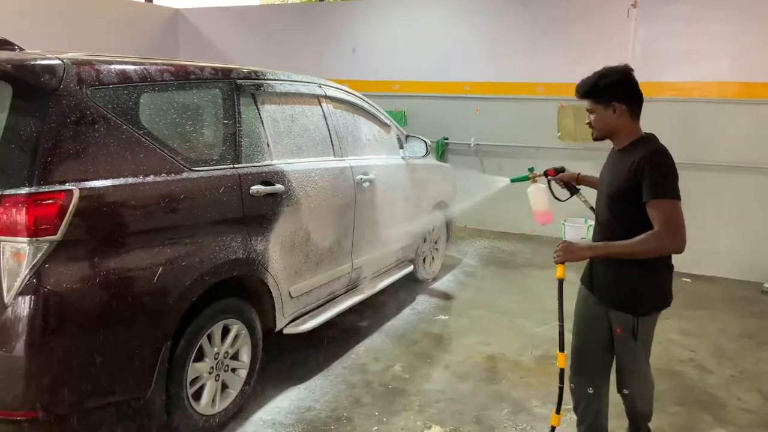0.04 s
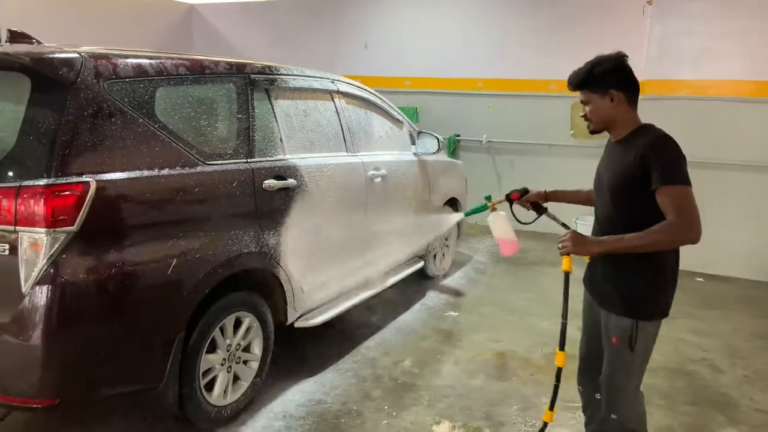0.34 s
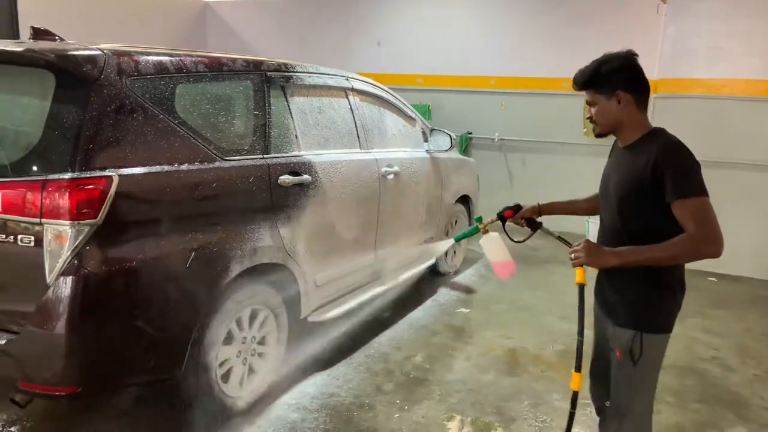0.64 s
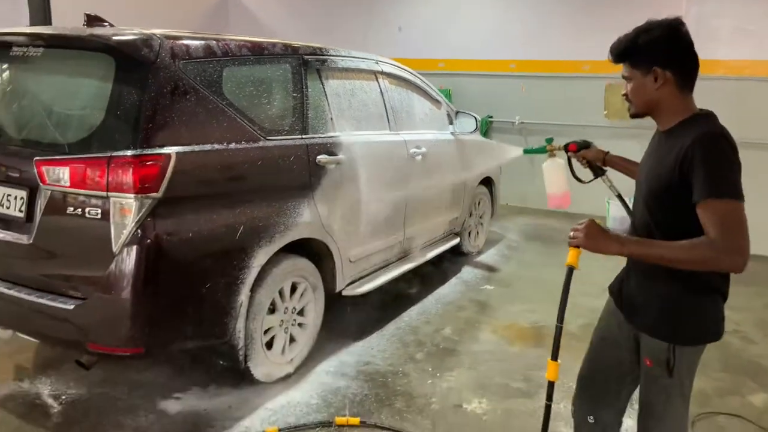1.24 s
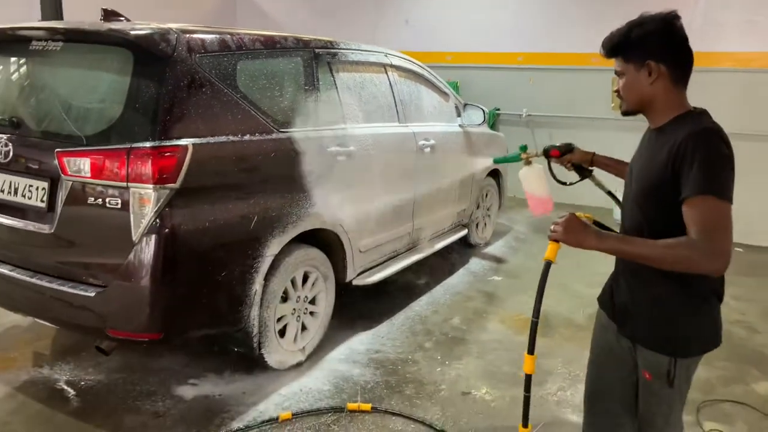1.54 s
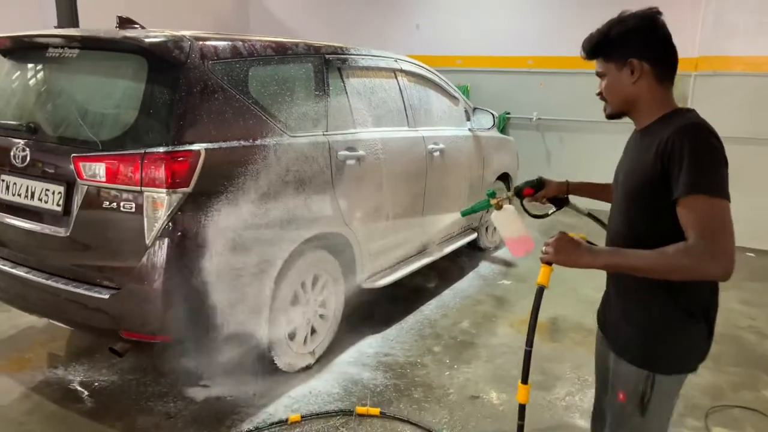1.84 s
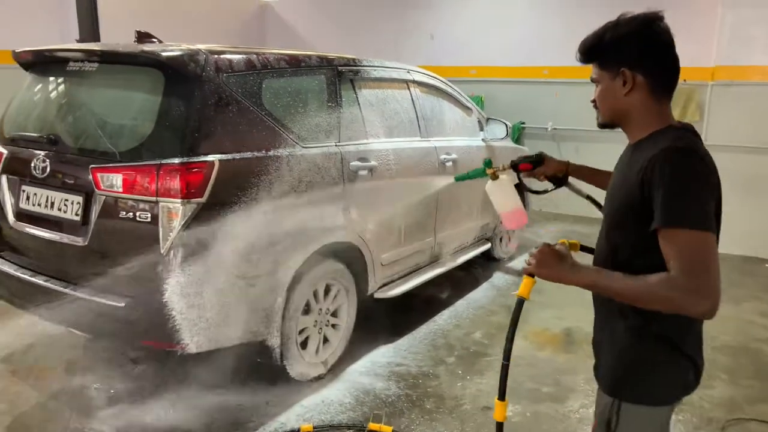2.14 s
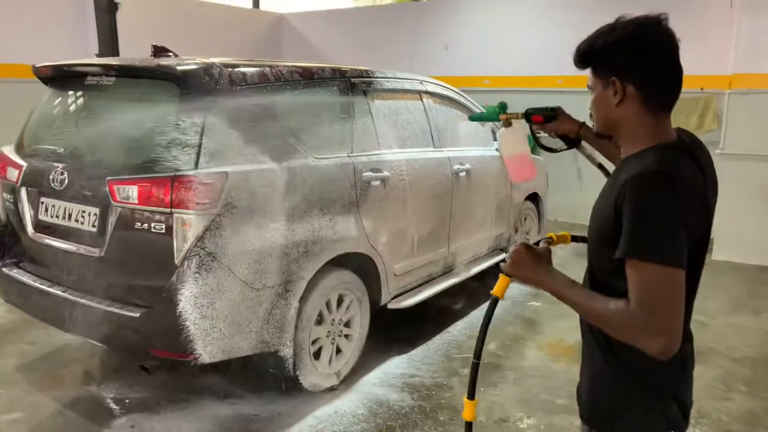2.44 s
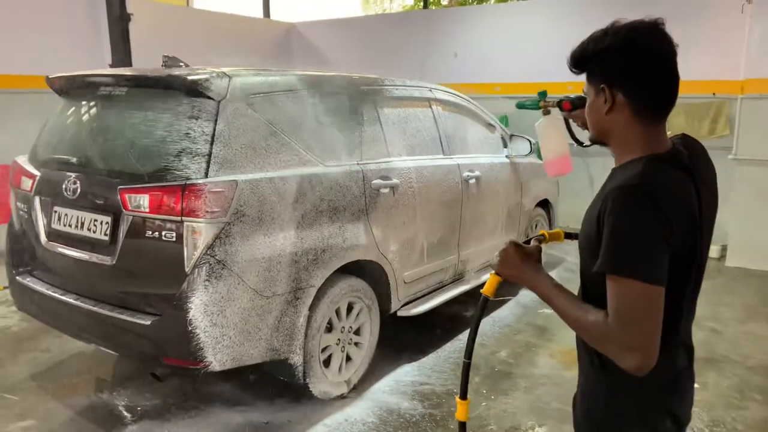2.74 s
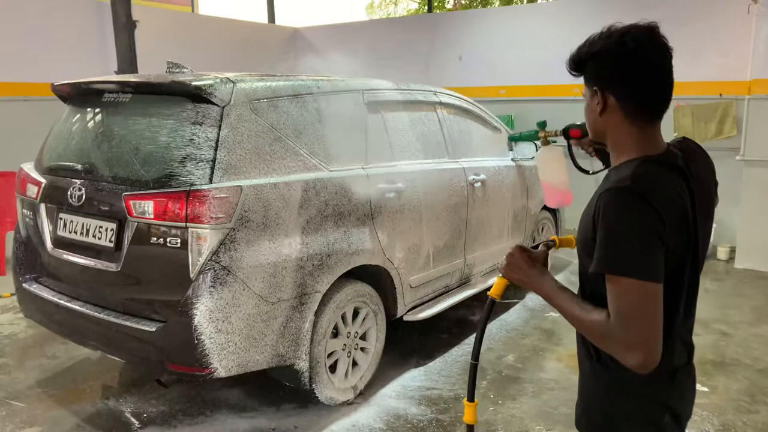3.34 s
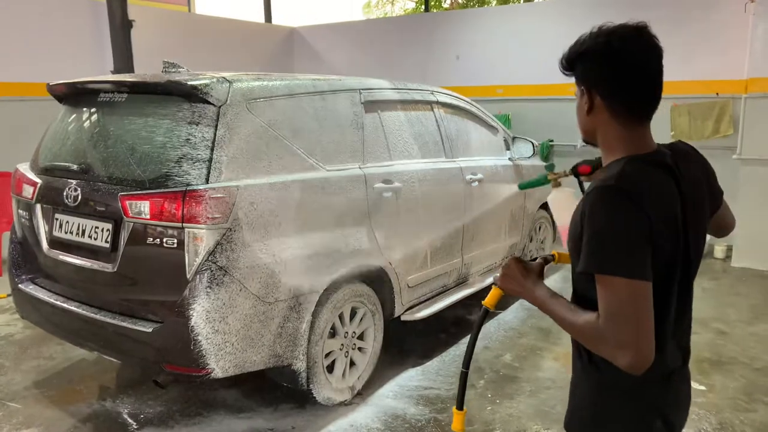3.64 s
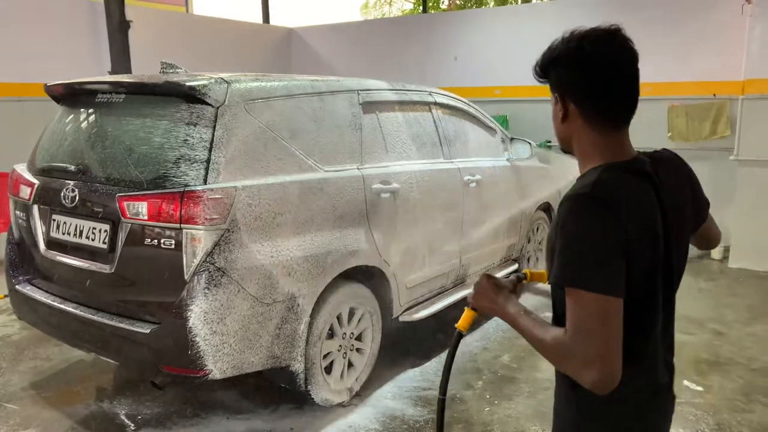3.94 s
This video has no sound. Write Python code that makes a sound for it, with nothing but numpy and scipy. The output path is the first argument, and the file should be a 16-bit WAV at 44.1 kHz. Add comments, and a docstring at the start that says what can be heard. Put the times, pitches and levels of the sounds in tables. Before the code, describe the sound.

The continuous hiss of a foam sprayer sweeps over a car, shifting in tone and easing slightly near the end. Two closely spaced microphones also catch soft foam splatter and a low, throbbing pump motor in the wash bay.

```python
"""A wash bay, where a foam gun sprays a car. The jet hisses with wandering resonances, swishes past
the wheel arch and brightens or dulls as it is swept about; its reflection off the wet floor combs
the hiss as the gun is raised. Foam washes and patters on the panels. Behind it the pressure pump
throbs and its motor hums. Two closely spaced microphones hear it all."""
import sys
import numpy as np
from scipy import signal
from scipy.fft import rfft, irfft, next_fast_len
from scipy.io import wavfile
from scipy.ndimage import uniform_filter1d, map_coordinates

SR = 44100
rng = np.random.default_rng(int(sys.argv[2]) if len(sys.argv) > 2 else 0)


def transcribe(u):
    """Save the signal u as a 16-bit wav file named by the first command-line argument.

    u: samples, shape (n,) or (channels, n), limited to [-1, 1]; the rate is SR.
    q: integer samples, one column per channel.
    """
    v = np.clip(np.atleast_2d(u).T, -1, 1)
    q = np.round(v * 32767).astype(np.int16)
    wavfile.write(sys.argv[1], SR, q)


N = 176400
TIME = np.arange(N) / SR


def amp(db):
    return 10 ** (np.asarray(db) / 20)


def unit_rms(x):
    return x / np.sqrt(np.mean(x ** 2) + 1e-20)


def along(points, hz):
    """A curve through (frequency, value) points, read on a log axis."""
    freqs, values = np.transpose(points)
    return np.interp(np.log(hz + 1), np.log(freqs + 1), values)


def automation(rows, at=TIME):
    """One curve for each column after the time."""
    times, *columns = np.transpose(rows)
    return [np.interp(at, times, column) for column in columns]


def wobble(rate_hz):
    """A smooth random curve with rate_hz knots a second."""
    return map_coordinates(rng.standard_normal(1024), [TIME * rate_hz], mode="wrap")


def filtered(x, response):
    """x through a complex frequency response."""
    size = next_fast_len(N + SR // 4)
    return irfft(rfft(x, size) * response(np.fft.rfftfreq(size, 1 / SR)), size)[..., :N]


def steady(x):
    """x with its slow changes of level evened out."""
    power = uniform_filter1d(np.mean(x ** 2, axis=0), size=6000)
    return x / unit_rms(np.sqrt(np.abs(power)))


def moving_bell(x, track, width_hz):
    """x through a bell EQ that follows (time, centre, boost) rows."""
    hz, times, bins = signal.stft(x, SR, nperseg=1024, noverlap=768)
    centre_hz, boost_db = automation(track, times)
    bell = np.exp(-((hz[:, None] - centre_hz) / width_hz) ** 2)
    return signal.istft(bins * amp(boost_db * bell), SR, nperseg=1024, noverlap=768)[1][:, :N]


# How alike the two microphones sound (frequency [Hz], likeness [0-1])
MIC_LIKENESS = [(60, .99), (200, .95), (450, .36), (750, .46), (1000, .2), (2000, .6), (3200, .08),
                (4000, .58), (4600, .45), (5050, .1), (6400, .68), (7100, .28), (8400, .97), (11000, .92),
                (12400, .9), (13500, .99), (15400, .9)]
# Phase between them (frequency [Hz], lag of the left [rad])
MIC_LAG = [(60, .1), (500, .3), (900, -.5), (1400, .9), (2100, .4), (4600, .25), (4900, .3), (5200, 2.6),
           (5800, 1.6), (6300, .2), (6900, .3), (7600, 2.1), (8600, 3.14), (9600, 4.7), (10600, 6.1),
           (11500, 6.4), (12400, 8.1), (13200, 9.4), (14200, 9.6), (14700, 11.6), (15400, 12.5)]
# Their balance (frequency [Hz], left minus right [dB])
MIC_BALANCE = [(60, -1.5), (110, -4), (380, -1), (1000, 0.5), (2300, -0.1), (3700, -1.5), (5200, -4),
               (6500, -0.5), (8100, -1), (15000, 0.5)]
def stereo_noise(spectrum, patchy_db):
    """Coloured noise of rms 1 with narrow patches of random gain, as the microphone pair hears it."""
    bins = signal.stft(rng.standard_normal((2, N)), nperseg=2048)[2]
    patches = uniform_filter1d(rng.standard_normal(bins.shape[1:]), size=3, axis=0)
    patches = uniform_filter1d(patches, size=8, axis=1)
    noise = signal.istft(bins * amp(patchy_db * unit_rms(patches)), nperseg=2048)[1][:, :N]

    def colour_and_width(hz):
        angle = np.arccos(np.clip(along(MIC_LIKENESS, hz), 0, 1)) / 2
        return amp(along(spectrum, hz)) * [np.cos(angle), np.sin(angle)]

    def balance_and_lag(hz):
        split = np.array([[.5], [-.5]])
        return amp(split * along(MIC_BALANCE, hz)) * np.exp(-1j * split * along(MIC_LAG, hz))

    mid, side = filtered(noise, colour_and_width)
    return unit_rms(filtered(np.array([mid + side, mid - side]), balance_and_lag))


# Bounce off the wet floor, later when the gun is held high (time [s], delay [ms], strength [0-1])
FLOOR_BOUNCE = [(0, 3.6, .3), (.3, 3.1, 0.02), (.45, 3.23, 0.35), (.65, 3.5, 0.4), (.9, 3.73, 0.6),
                (1.05, 3.2, 0.05), (1.3, 3.44, 0.33), (1.58, 3.6, 0.6), (1.7, 3.51, 0.3), (1.85, 3.55, 0.5),
                (1.98, 3.93, 0.45), (2.3, 4.4, 0.2), (2.55, 4.76, 0.34), (2.8, 4.6, 0.26),
                (3.05, 4.54, 0.2), (3.3, 4.6, 0.45), (3.6, 4.05, 0.3), (4, 4.5, 0.2)]
def floor_comb(hiss):
    """The floor returns a late copy of the hiss, cutting a moving comb into it."""
    delay_ms, strength = automation(FLOOR_BOUNCE)
    read_at = (TIME - delay_ms / 1000) * SR
    return hiss + strength * np.array([map_coordinates(channel, [read_at]) for channel in hiss])


# The spray's hollow note (time [s], centre [Hz], boost [dB])
HOLLOW_RESONANCE = [(0, 2200, 5), (.3, 2210, 2.5), (.44, 2260, 7), (.54, 2110, 6), (.72, 2160, 4),
                    (.9, 2210, 11.5), (1.05, 2200, 4), (1.25, 2320, 4), (1.5, 2230, 10), (1.75, 2290, 4.5),
                    (2.0, 2210, 7.5), (2.25, 2230, 6.5), (2.52, 2175, 6), (2.7, 2200, 9), (2.78, 2270, 7),
                    (2.95, 2240, 5.5), (3.25, 2350, 6), (3.45, 2240, 4), (3.75, 2190, 5.5), (4, 2200, 3)]
# The brighter, main peak of the hiss (time [s], centre [Hz], boost [dB])
MAIN_RESONANCE = [(0, 3920, 6), (.3, 3750, 3), (.48, 3730, 2), (.57, 3900, 4), (.73, 3920, 5.5),
                  (.85, 3530, 5), (1.0, 3630, 3.5), (1.3, 3680, 4), (1.55, 3830, 3.5), (1.72, 3930, 3.5),
                  (2.02, 3580, 3.5), (2.4, 3740, 3), (2.65, 3930, 1.5), (3.0, 3800, 5.5), (3.5, 3800, 4.5),
                  (3.68, 3580, 4), (3.85, 3900, 3.5), (4, 3700, 5)]
def spray_resonances(hiss):
    """A hollow resonance wanders and surges with the aim; the main one drifts above it."""
    hiss = moving_bell(hiss, HOLLOW_RESONANCE, width_hz=146)
    return moving_bell(hiss, MAIN_RESONANCE, width_hz=254)


# Tone of the raw hiss (frequency [Hz], relative level [dB])
JET_SPECTRUM = [(300, -37), (1000, -23.5), (1550, -16.5), (1850, -9.5), (2050, -4.5), (2400, -4.5),
                (2750, -6.5), (3100, -5), (3450, -2.5), (3750, -2.5), (4150, -3.5), (4650, -7), (5100, -6),
                (5700, -9), (6300, -8.5), (7400, -11.5), (8400, -10.5), (9500, -8), (11300, -8),
                (12400, -12.5), (13300, -11), (14400, -18.5), (15600, -13.5)]
# The five bands of the hiss, low to high (centre [Hz])
JET_BANDS = [2300, 3500, 4500, 6400, 9500]
# Band faders as the gun is swept, relative to JET_DB
# (time [s], low resonance [dB], main resonance [dB], upper shoulder [dB], treble [dB], top fizz [dB])
BAND_FADERS = [(0.0, -33, -29.5, -32, -34.9, -31), (0.15, -32, -30.5, -30.4, -31.5, -30.5),
               (0.32, -33, -28, -25.5, -30, -28.5), (0.45, -28.7, -27, -29.5, -31, -27.5),
               (0.55, -30.0, -28.5, -27, -28, -28.4), (0.7, -30.5, -27.0, -26, -31, -27.6),
               (0.8, -32.4, -29, -28.5, -31.5, -27.5), (0.88, -28.5, -29.5, -29, -32.5, -28.5),
               (0.97, -30.5, -32.5, -30.5, -31.5, -28), (1.06, -32, -28, -33, -36.5, -31.5),
               (1.2, -31.5, -28.5, -30.5, -34.5, -28.5), (1.35, -30.5, -29, -34, -34, -31.0),
               (1.5, -29.0, -29, -30, -32, -28), (1.75, -30, -29, -30.8, -33, -28),
               (2.02, -30.1, -28.5, -30.5, -33.5, -32.8), (2.22, -30.5, -29, -31.5, -33.5, -25.5),
               (2.45, -30, -30.1, -31.5, -33.5, -26.5), (2.62, -30.5, -31, -30, -35, -27),
               (2.74, -31, -28.5, -30.5, -36.5, -32.5), (2.87, -34.5, -32, -33.6, -35.5, -34),
               (3.1, -33, -31, -31.5, -37, -35.3), (3.32, -29.5, -30.1, -31, -34.3, -34.0),
               (3.56, -31.0, -30, -30.5, -30.5, -25.5), (3.72, -32.5, -29.6, -35.5, -36.5, -33),
               (3.86, -32.5, -35, -33, -38, -36.9), (4.0, -33.8, -30, -36, -37.5, -39)]
JET_DB, FLUTTER_DB = -22, 0.69
def jet():
    """Nozzle hiss, combed and resonant; each band flutters, and swells as the gun is swept."""
    hiss = floor_comb(stereo_noise(JET_SPECTRUM, patchy_db=2.9))
    hiss = wheel_arch_swish(spray_resonances(hiss))
    out = np.zeros((2, N))
    for level_db, share in zip(automation(BAND_FADERS), np.eye(len(JET_BANDS))):
        crossover = list(zip(JET_BANDS, share))
        band = filtered(hiss, lambda hz: np.sin(np.pi / 2 * along(crossover, hz)) ** 2)
        out += steady(band) * unit_rms(amp(level_db + FLUTTER_DB * wobble(24.93)))
    return amp(JET_DB) * out


# Fader for the landing foam (time [s], relative level [dB])
FOAM_FADER = [(0, -42), (.35, -41.5), (.65, -42.5), (1.0, -44.5), (1.4, -44), (1.9, -43.5), (2.3, -43.5),
              (2.8, -45), (3.3, -45), (4, -45)]
# Its dull, soft tone (frequency [Hz], relative level [dB])
FOAM_SPECTRUM = [(10, -60), (60, -33), (150, 1), (280, 1.5), (370, -3.5), (440, -3.5), (560, -2.5),
                 (730, -1.5), (940, -7.5), (1300, -7.5), (2000, -23), (4000, -41)]
FOAM_TRIM_DB = 1.5
def foam_wash():
    """The soft wash of foam landing on the panels."""
    level_db, = automation(FOAM_FADER)
    return amp(level_db + FOAM_TRIM_DB) * stereo_noise(FOAM_SPECTRUM, patchy_db=1.5)


DROPS_PER_S, DROPS_DB, DROP_SPREAD_DB = 970, -43.5, 2.5
DROP_CENTRE_HZ, DROP_DECAY_CYCLES = 4130, 3.9
def droplets():
    """Single drops tick on paint and floor: short damped rings, a few much larger than the rest."""
    draws = rng.random((int(DROPS_PER_S * N / SR), 4))
    start, size_rank, pitch, pan = draws.T[:, :, None]
    age = np.arange(128)  # samples
    cycles = DROP_CENTRE_HZ * 2 ** (2 * pitch - 1) * age / SR  # up to an octave either way
    strength = amp(-DROP_SPREAD_DB * np.log(np.maximum(size_rank, np.exp(-6))))
    rings = strength * np.sin(2 * np.pi * cycles) * np.exp(-cycles / DROP_DECAY_CYCLES)
    at = ((start * N).astype(int) + age).ravel()
    patter = [np.bincount(at, (rings * np.sqrt(share)).ravel(), N)[:N] for share in (pan, 1 - pan)]
    return amp(DROPS_DB) * unit_rms(np.array(patter))


# Fader for the pump's low end (time [s], relative level [dB])
PUMP_FADER = [(0, -44.5), (.22, -40), (.32, -37.5), (.55, -39.5), (.7, -40), (1, -42.5), (1.9, -42.5),
              (2.35, -41), (2.8, -43), (3.2, -41), (3.55, -41), (3.8, -39.5), (4, -43.5)]
# Tone of its thump and rumble (frequency [Hz], relative level [dB])
PUMP_SPECTRUM = [(10, -60), (22, -31), (33, -20), (44, -6), (55, 0.5), (66, 1), (78, -4.5), (95, 0.5),
                 (110, 2), (130, -5.5), (150, -7.5), (175, -15), (300, -23), (600, -66)]
STROKE_HZ, FIRST_CREST_S, THROB_DB = 10.89, .039, 2.5
PUMP_TRIM_DB, THUMP_MIX_DB, THUMP_SMEAR_RAD = -1, -6.5, 0.81
def pump():
    """Every pressure stroke gives the same soft thump and swells a low rumble."""
    level_db, = automation(PUMP_FADER)
    stroke_phase = 2 * np.pi * STROKE_HZ * (TIME - FIRST_CREST_S)
    thump = np.zeros(N)
    for harmonic in range(3, 16):
        phase = harmonic * stroke_phase + THUMP_SMEAR_RAD * rng.normal()
        thump += amp(along(PUMP_SPECTRUM, harmonic * STROKE_HZ)) * np.cos(phase)
    rumble = steady(stereo_noise(PUMP_SPECTRUM, patchy_db=-0.5))
    throb = unit_rms(rumble * amp(THROB_DB * np.cos(stroke_phase)))
    pan_db = np.array([[-1.5], [1.5]])
    return amp(level_db + PUMP_TRIM_DB) * (throb + amp(THUMP_MIX_DB + pan_db) * unit_rms(thump))


# Hum on harmonics of the motor shaft (harmonic [number], level [dB])
SHAFT_HARMONICS = [(6, -72), (8, -62), (9, -75), (10, -63.5), (12, -60)]
# Tones of the housing (frequency [Hz], level [dB])
HOUSING_TONES = [(227, -55.5), (324.4, -58), (359.2, -62.5)]
SHAFT_HZ = 47.88
def motor():
    """Slightly unsteady hum lines; the bay gives each its own phase at each microphone."""
    shaft_tones = [(round(harmonic) * SHAFT_HZ, db) for harmonic, db in SHAFT_HARMONICS]
    out = np.zeros((2, N))
    for hz, db in shaft_tones + HOUSING_TONES:
        phase = 2 * np.pi * (hz * TIME + rng.random()) + 0.26 * wobble(2.93)
        mic_phase = rng.normal(0, 1.0, (2, 1))
        out += np.sqrt(2) * amp(db + wobble(1.57)) * np.sin(phase + mic_phase)
    return out


# The swish that dives and climbs back (time [s], centre [Hz], boost [dB])
LOWER_SWISH = [(.12, 5900, 0), (.24, 5400, 3.5), (.31, 4850, 3.5), (.38, 4150, 2.5), (.45, 3100, 5),
               (.5, 3000, 1.5), (.55, 4350, 3), (.66, 4200, 2.5), (.74, 4500, 4.5), (.92, 4800, 2),
               (1.02, 5000, 0)]
# Its higher companion (time [s], centre [Hz], boost [dB])
UPPER_SWISH = [(.29, 6900, -3.5), (.35, 6600, 9.5), (.41, 6500, 10), (.48, 5400, 7), (.57, 6300, 6),
               (.68, 6000, 3), (.9, 6300, 2.5), (1.02, 6300, -0.5)]
def wheel_arch_swish(hiss):
    """Two peaks glide as the jet dips along the car's side into the wheel arch and out again."""
    for track in LOWER_SWISH, UPPER_SWISH:
        hiss = unit_rms(moving_bell(hiss, track, width_hz=380))
    return hiss


def scene():
    """Spray in front, pump behind."""
    return jet() + foam_wash() + droplets() + pump() + motor()


HIGH_CUT_HZ = 15750
def record(dry):
    """A brick-wall high cut takes off the very top of the fizz."""
    return filtered(dry, lambda hz: hz < HIGH_CUT_HZ)


dry = scene()
out = record(dry)
transcribe(out)
```